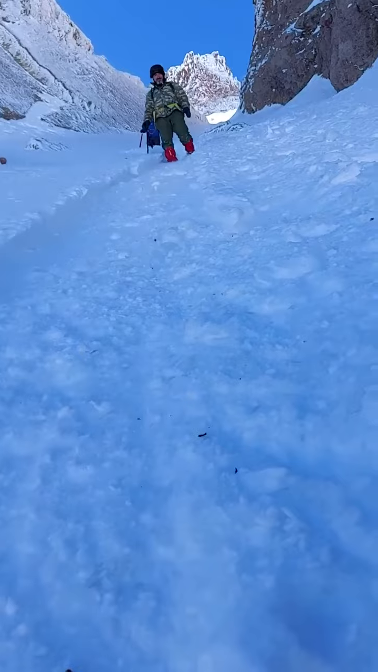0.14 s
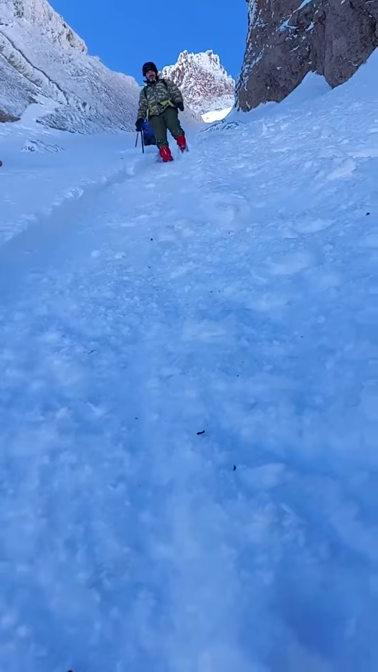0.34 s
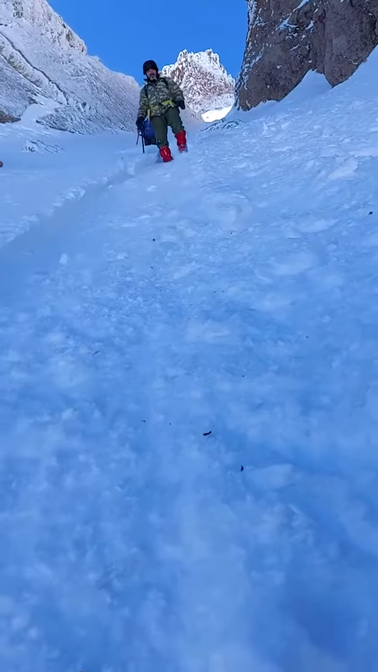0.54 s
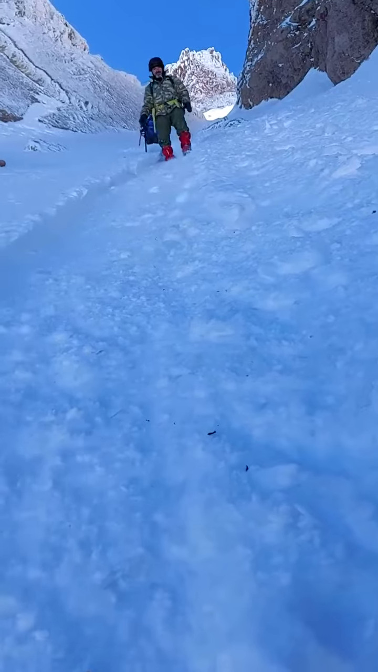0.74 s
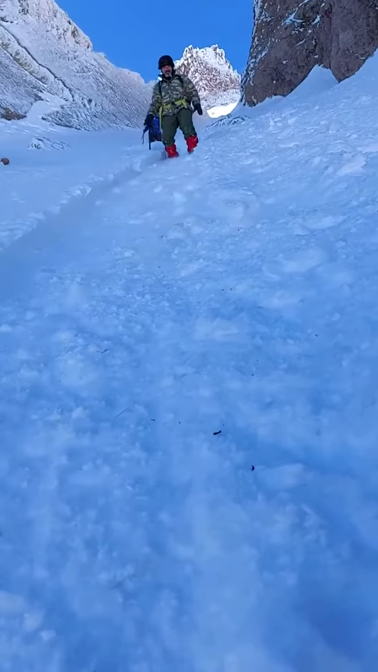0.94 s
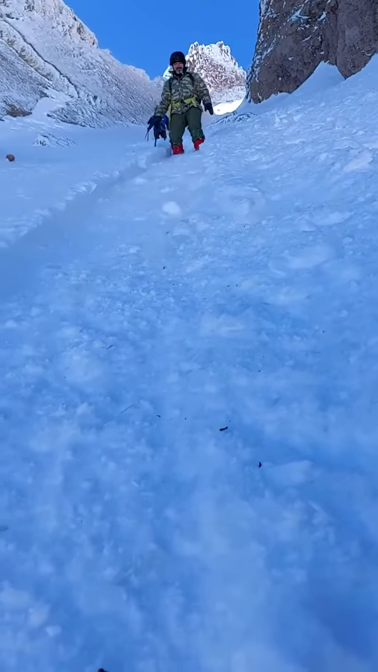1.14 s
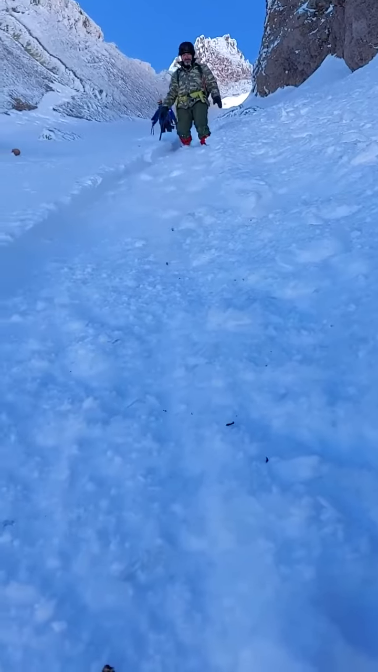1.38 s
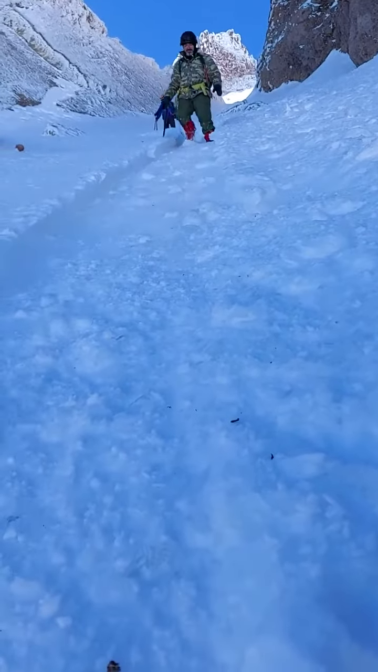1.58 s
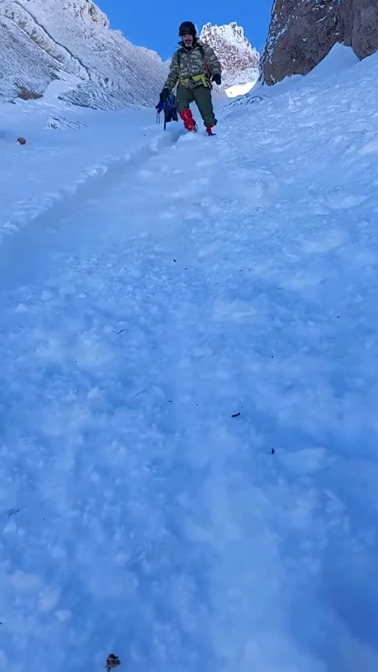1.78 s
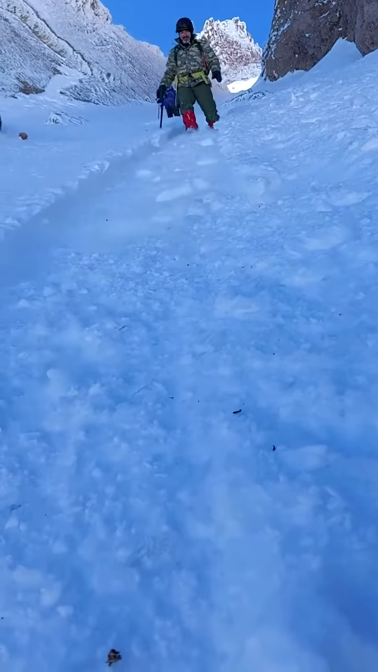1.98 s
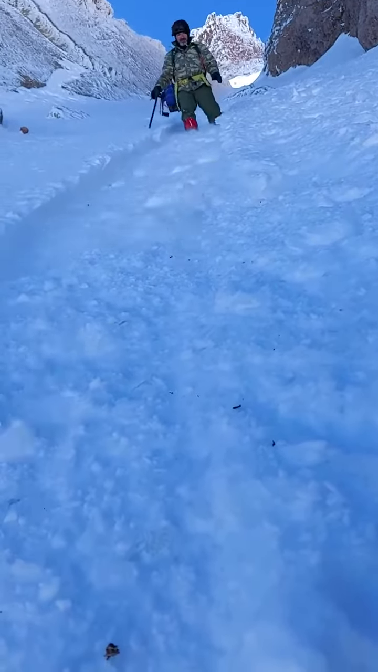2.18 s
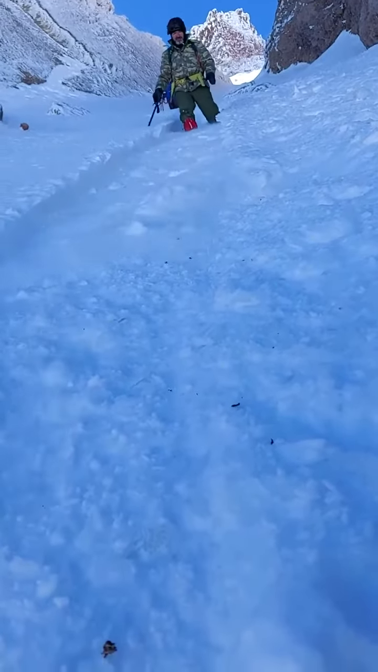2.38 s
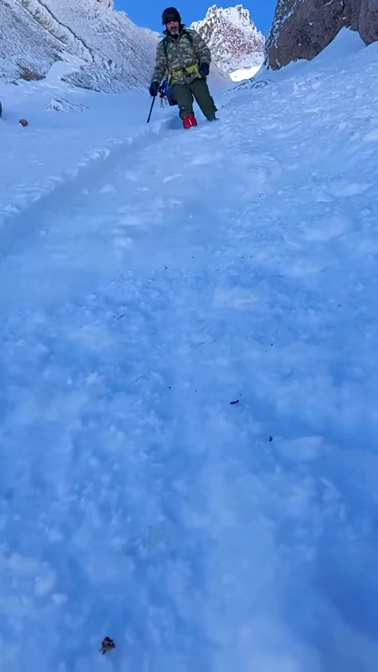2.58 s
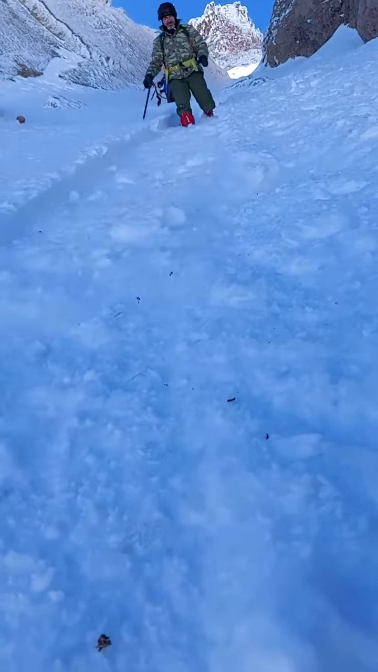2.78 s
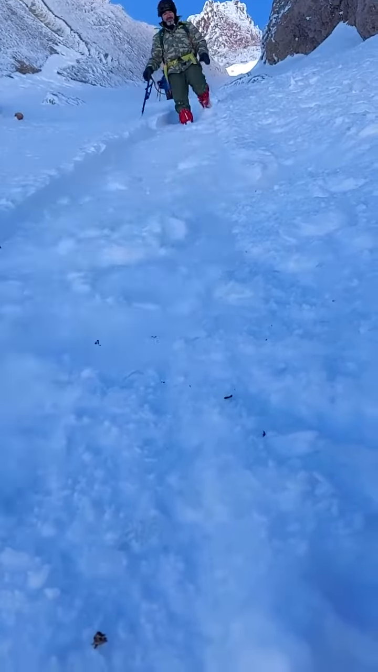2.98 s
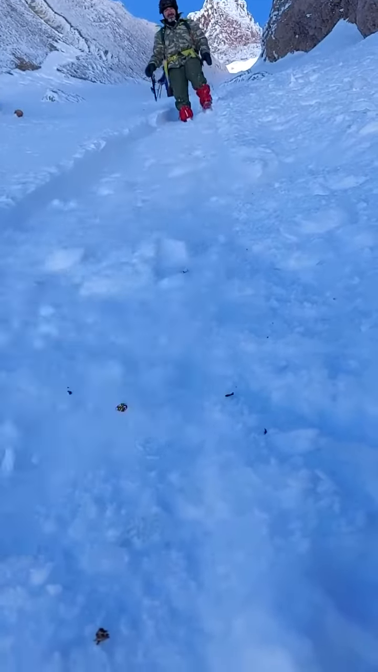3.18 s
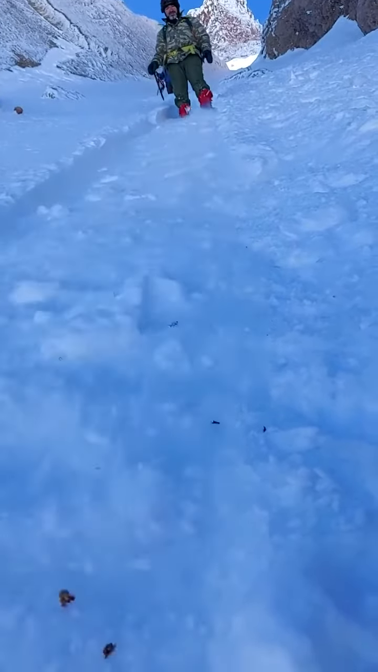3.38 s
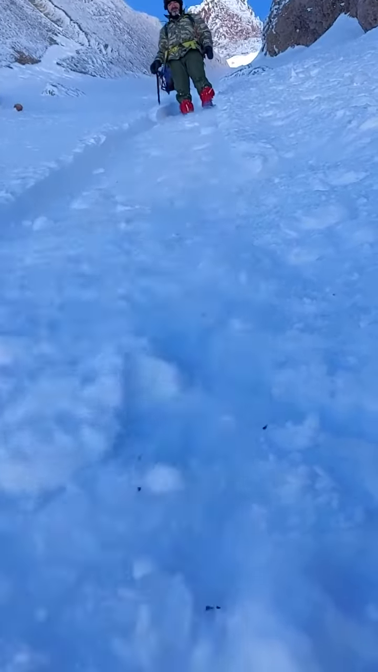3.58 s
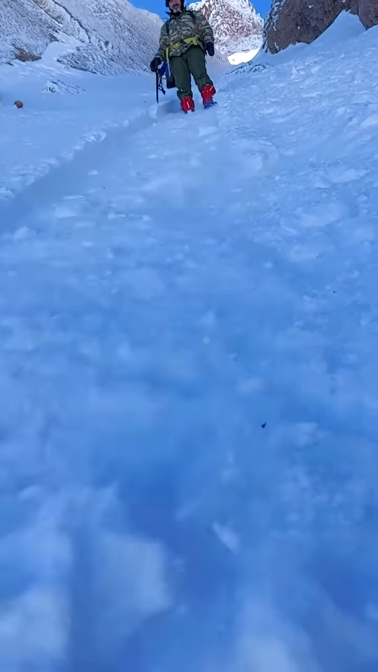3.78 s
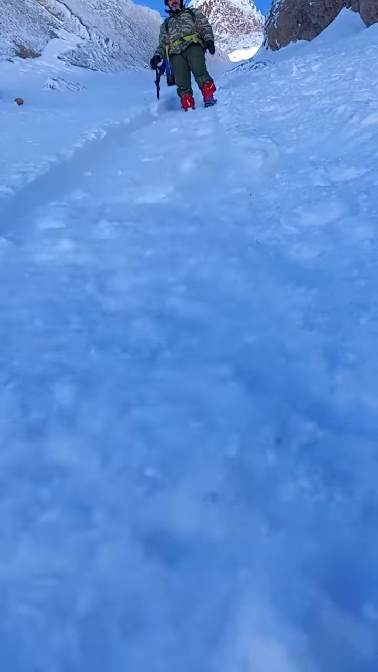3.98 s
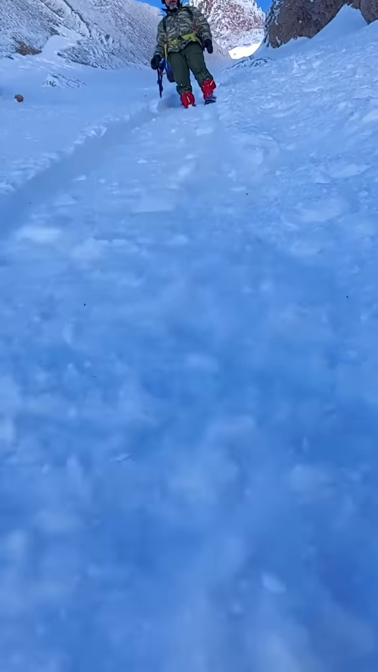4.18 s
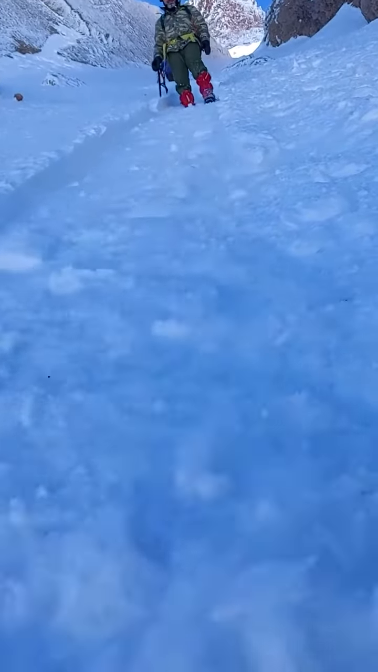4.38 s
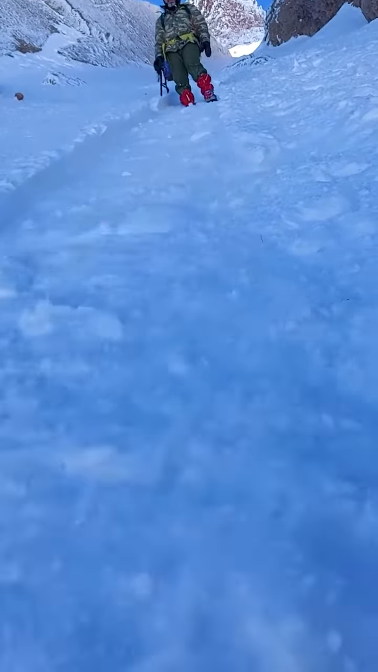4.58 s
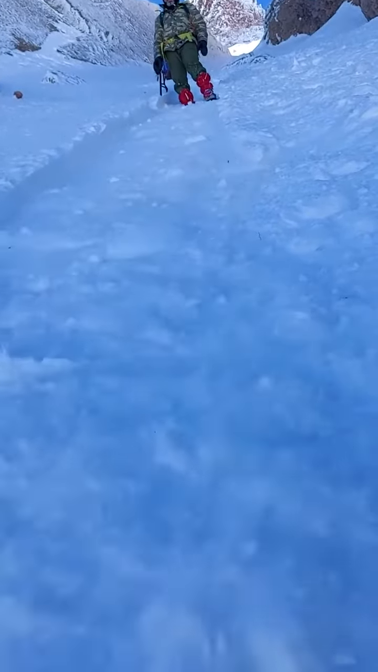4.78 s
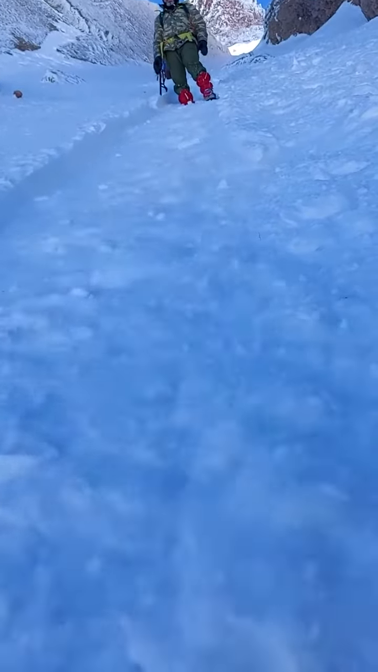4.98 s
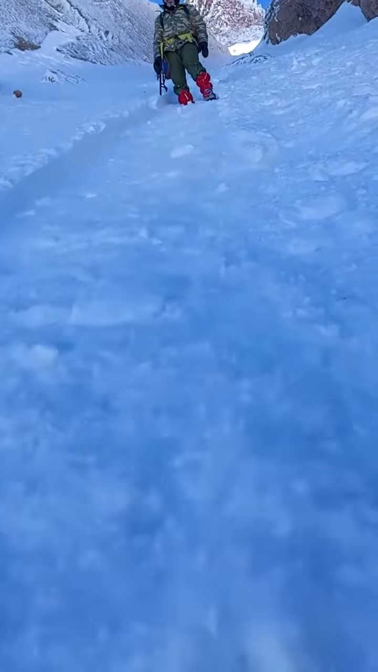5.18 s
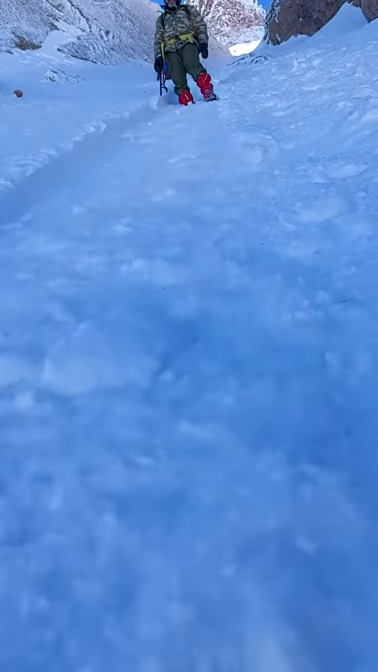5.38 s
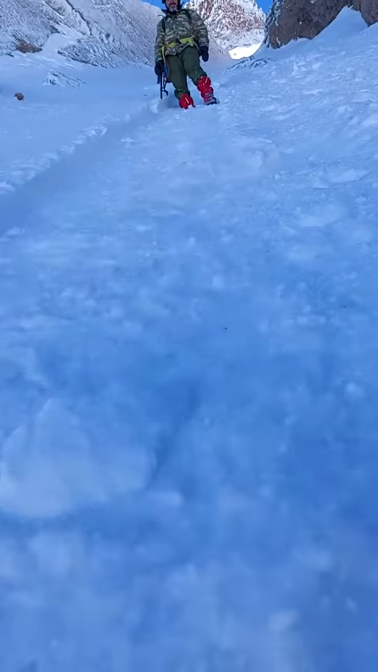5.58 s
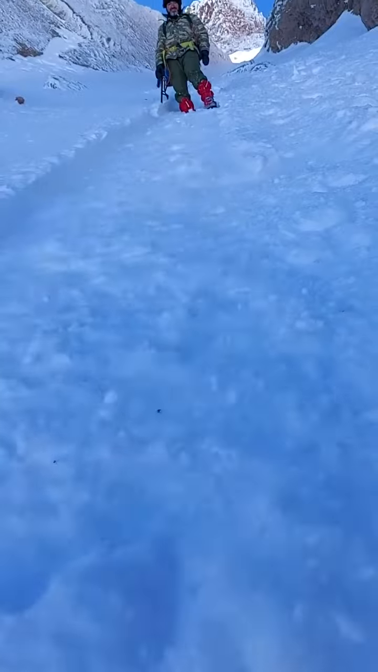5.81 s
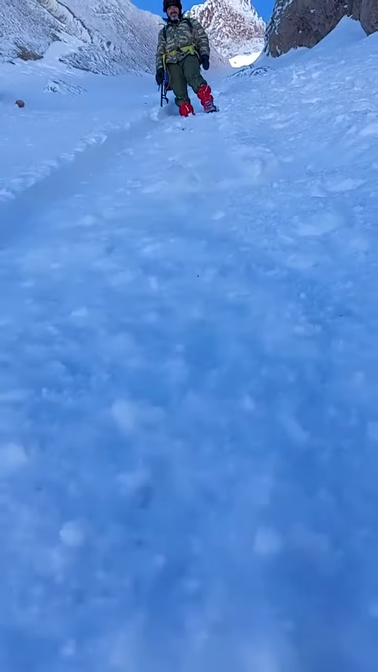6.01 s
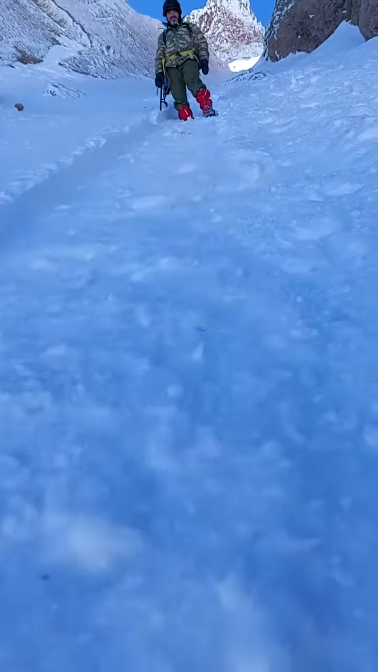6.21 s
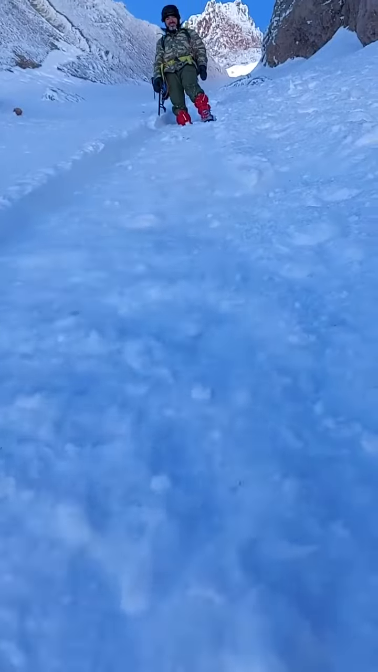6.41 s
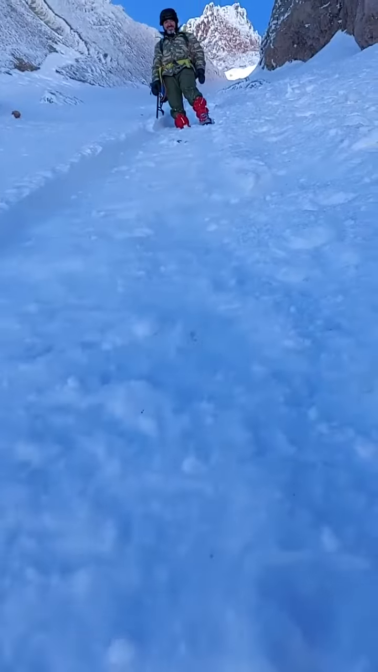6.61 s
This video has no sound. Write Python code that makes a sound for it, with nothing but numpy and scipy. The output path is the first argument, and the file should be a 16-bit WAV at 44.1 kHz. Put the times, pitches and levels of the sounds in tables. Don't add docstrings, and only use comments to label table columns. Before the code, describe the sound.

A steady rush of sliding snow swells close by, cracking and grinding, then streams on, after a climber's crunching steps and small metallic clinks.

```python
import sys
import numpy as np
from scipy import signal
from scipy.io import wavfile
from scipy.ndimage import uniform_filter1d, map_coordinates

SR = 44100
rng = np.random.default_rng(int(sys.argv[2]) if len(sys.argv) > 2 else 0)


def convert_level_to_amplitude(level_db):
    exponent = np.asarray(level_db, float) / 20
    return 10 ** exponent


def to_wav(s):
    ch = np.atleast_2d(s).T
    pcm = np.round(np.clip(ch, -1, 1) * 32767)
    wavfile.write(sys.argv[1], SR, pcm.astype(np.int16))


N = 293265

# [t/s, lateness at the left port/samples, width of the flow/samples]
SNOW_PATH = [(0, 17, 2.0), (.15, 16, 1.6), (.38, 18, 2.0), (.46, 21, 5), (.64, 20, 5), (.72, 15.5, 1.6),
             (.8, 16, 2.5), (.87, 24, 1.3), (1.0, 23, 1.3), (1.16, 23.5, 1.3), (1.24, 20, 5),
             (1.33, -6, 3.5), (1.47, -7.2, 1.2), (1.56, -7.5, 2.2), (1.65, -8, 1.0), (1.75, -8.8, 1.6),
             (2.0, -8.5, 3.5), (2.3, -7, 1.5), (2.4, -6.2, 1.2), (2.5, -5.5, .5), (2.72, -5.5, .3),
             (2.775, -5.0, .2), (2.795, -4.2, .2), (2.85, -3.85, .4), (2.93, -3.8, .8), (3.0, -4, 1.2),
             (3.15, -2.5, 1.6), (3.3, 0.3, 1.8), (3.45, 4.5, 3.4), (3.62, 12, 2.0), (3.8, 19, 3.0),
             (3.95, 24.5, 2.0), (4.3, 21.5, 3.0), (4.7, 21, 3.5), (4.88, 24.5, 1.5), (5.15, 21, 3.5),
             (5.6, 23, 2.4), (5.9, 24, 2.0), (6.65, 24.5, 2.4)]
SCRAPE_DB = -38


def rms_one(x):
    return x / np.sqrt(np.mean(x ** 2) + 1e-20)


def bandpass(x, low_hz, high_hz, order):
    return signal.sosfilt(signal.butter(order, [low_hz, high_hz], "band", fs=SR, output="sos"), x)


def resonance(x, hz, width_hz):
    r = np.exp(-np.pi * width_hz / SR)
    return signal.lfilter([(1 - r * r) / 2, 0, (r * r - 1) / 2], [1, -2 * r * np.cos(2 * np.pi * hz / SR), r * r], x)


def in_time(rows):
    s, *columns = np.transpose(rows)
    return [np.interp(np.arange(N) / SR, s, column) for column in columns]


def per_sample(coarse):
    return np.interp(np.arange(N) / 32, np.arange(len(coarse)), coarse)


def swells(rows, rise_db_per_s, fall_db_per_s):
    start, hold, db = np.transpose(rows)[:3, :, None]
    t = np.arange(0, N + 32, 32) / SR
    early = np.maximum(start - t, 0)
    late = np.maximum(t - start - np.abs(hold), 0)
    return convert_level_to_amplitude(db - rise_db_per_s * early - fall_db_per_s * late)


def swell_gain(rows, rise_db_per_s, fall_db_per_s):
    return per_sample(swells(rows, rise_db_per_s, fall_db_per_s).sum(axis=0))


def drift(rate):
    r = np.exp(-80 * np.pi * rate / SR)
    noise = rng.standard_normal(N // 40 + 2002)
    slow = signal.lfilter([1], [1, -2 * r, r * r], noise)[2000:]
    return np.interp(np.arange(N) / 40, np.arange(len(slow)), rms_one(slow))


def ports(x, lag):
    left = map_coordinates(x, [np.arange(N) - lag], order=2, mode="nearest")
    return np.array([left, x])


def grains(per_s, spread_db, clump_db, smooth):
    draw = rng.laplace(size=N)
    sizes = np.sign(draw) * convert_level_to_amplitude(spread_db * np.minimum(np.abs(draw), 5))
    born = rng.random(N) < per_s * convert_level_to_amplitude(clump_db * drift(40)) / SR
    return rms_one(rms_one(sizes * born) + smooth * rng.standard_normal(N))


def hits(table, lags, cycles, rough, gain_db, rise_s):
    rough_reach = 1.7
    out = np.zeros((2, N + SR))
    t = np.arange(SR // 8) / SR
    noises = rng.standard_normal((len(table), len(t)))
    for (s, peak_db, hz, *t60), lag, noise in zip(table, lags, noises):
        top_hz = min(rough_reach * hz, SR / 3)
        noise = rms_one(signal.lfilter(*signal.butter(2, top_hz, fs=SR), noise))
        fade_s = t60[0] if t60 else cycles / hz
        fade = convert_level_to_amplitude(-60 * t / fade_s) * (1 - np.exp(-t / rise_s))
        ring = convert_level_to_amplitude(peak_db + gain_db) * fade * (np.sin(2 * np.pi * hz * t) + rough * noise)
        for port, start in enumerate((round(s * SR + lag), round(s * SR))):
            out[port, start:start + len(t)] += ring
    return out[:, :N]


def swing(hz):
    # [t/s, fine powder level/dB, heavy lumps level/dB]
    amount = [(0, -4, -16.5), (.3, -5, -15), (.55, -11, -19.5), (1.0, -9, -14.5), (1.4, -12.5, -21.5),
              (1.7, -8.5, -18), (2.0, -14.5, -16), (2.4, -8.5, -19), (2.75, -1.5, -14.5), (3.05, -1, -11),
              (3.35, 4, -5.5), (3.5, 3.5, -4.5), (3.75, 9.5, -4), (4.0, 12, 1.5), (4.3, 5, 0.5),
              (5.0, 0, 0.5), (5.8, 1.5, -1), (6.65, 0, -0.5)]
    # [f/Hz, share of powder, share of lumps, share of grinding]
    layers = [(298, 0.17, 0.91, -0.78), (603, 0.26, 1.07, -1.1), (1040, 0.12, 1.03, -0.36),
              (2900, 0.53, 0.42, 0.46), (7100, 0.85, 0.011, -0.89), (12700, 0.79, 0.014, -0.16)]
    # [start of the top t/s, hold/s, level against the flow/dB]
    surges = [(.12, 0.038, -17), (.62, 0.11, -12), (1.12, 0.019, -36), (1.5, 0.043, -25), (1.75, 0.04, -10),
              (2.12, 0.061, -6), (2.9, 0.02, -33), (3.35, 0.014, -20), (3.6, 0.032, -11),
              (3.84, 0.015, -12), (4.68, 0.024, -7), (4.87, 0.024, -7), (5.28, 0.066, -11),
              (5.58, 0.019, -13), (5.88, 0.12, -10), (6.25, 0.065, -14)]
    front_s, front_spread_s, grind_db = 4.04, 0.21, 4
    powder_db, lumps_db = in_time(amount)
    burst = swell_gain(surges, rise_db_per_s=291, fall_db_per_s=144)
    front_db = grind_db * np.exp(-((np.arange(N) / SR - front_s) / front_spread_s) ** 2)
    layer_hz, *shares = np.transpose(layers)
    shares = [np.interp(np.log(hz), np.log(layer_hz), share) for share in shares]
    return np.transpose(shares) @ [powder_db + 20 * np.log10(1 + burst), lumps_db, front_db]


def flow(lag, width, scattered):
    near = [grains(6000, spread_db=3.0, clump_db=2.5, smooth=1.2) for strand in range(3)]
    far = np.array([grains(6000, spread_db=6.5, clump_db=3.5, smooth=0.87) for port in range(2)])
    share = np.clip(scattered, 0, 1)
    versions = []
    for turn in (0, N // 2):
        strands = [ports(np.roll(g, turn), lag + side * width) for g, side in zip(near, (-1, 0, 1))]
        direct = np.sqrt((1 - share) / 3) * sum(strands)
        versions.append((direct, np.sqrt(share) * np.roll(far, turn, axis=1)))
    return versions


def slide(patchy_db, shared, scatter_hz):
    # [f/Hz, level per Hz/dB]
    colour = [(140, -3), (200, -3), (400, 0.5), (600, 2.5), (1200, -0.5), (2200, -0.5), (3200, 0.7),
              (4400, -0.77), (5900, -2), (7500, -2.5), (9000, 0), (11500, -3), (14000, 0.5), (16000, -2.5)]
    lag, width = in_time(SNOW_PATH)
    scattered = 0.19 + 0.12 * width
    lag = lag + 0.19 * width * drift(3.4)
    versions = flow(lag, width, scattered)
    together = drift(9)
    edges = 111 * 2 ** (np.arange(23) / 3)
    centres = np.sqrt(edges[1:] * edges[:-1])
    change_db = swing(centres)
    colour_hz, colour_db = np.transpose(colour)
    out = 0
    for k, hz in enumerate(centres):
        direct, scatter = versions[k % 2]
        scatter_gain = 0.5 + 2.04 / (1 + (scatter_hz / hz) ** 2)
        band = bandpass(direct + scatter * scatter_gain, edges[k], edges[k + 1], 2)
        flicker_db = patchy_db * (shared * together + drift(12.0))
        level_db = np.interp(np.log(hz), np.log(colour_hz), colour_db) + change_db[k] + flicker_db
        out = out + convert_level_to_amplitude(level_db) * np.sqrt(hz) * rms_one(band)
    return convert_level_to_amplitude(-81.0) * out


def lumps():
    # [t/s (each sounds 4 ms later), peak level/dB, f/Hz]
    blows = [(1.845, -36.5, 905), (2.766, -34.5, 630), (3.025, -29, 1550), (3.053, -17, 2020),
             (3.288, -27, 1640), (3.307, -29, 363), (3.47, -39, 482), (3.505, -28.5, 640),
             (3.687, -37, 567), (4.371, -22.5, 660), (4.521, -40, 440), (4.862, -36, 1750), (5.1, -34, 620),
             (5.29, -32, 450), (5.925, -60, 428), (6.071, -45, 295), (6.145, -35, 630), (6.337, -51, 204),
             (6.346, -31, 390), (6.52, -29.5, 595)]
    delay_s = .004
    lag = in_time(SNOW_PATH)[0]
    lags = [lag[int(blow[0] * SR)] for blow in blows]
    knocks = hits(blows, lags, cycles=3.4, rough=0.35, gain_db=7.0, rise_s=.0001)
    return np.roll(knocks, round(delay_s * SR), axis=1)


def snaps():
    # [t/s, peak level/dB, f/Hz, lateness at the left port/samples]
    cracks = [(.8185, -41, 2080, 18), (.841, -38, 2330, 13), (2.5916, -31, 6000, 0.5),
              (2.9097, -32, 4500, 3), (3.029, -36, 1890, 27), (3.053, -17.5, 6050, 19),
              (3.0562, -12, 7500, 23.5), (3.2902, -25, 3300, 4), (3.5775, -31, 3500, 14),
              (3.5952, -27.5, 3850, 13), (3.6228, -22, 3780, 10.5), (3.9277, -20.5, 3300, 23.5),
              (3.963, -22.5, 3470, 26.5), (3.985, -25, 3050, 26.5), (3.9947, -18.5, 3300, 21),
              (4.026, -22, 5100, 27.5), (4.697, -35, 7000, 21), (4.8364, -30, 5140, 24),
              (4.866, -29.5, 1590, 25), (5.8315, -36, 4500, 23), (5.865, -24, 6100, 24.5)]
    lags = np.transpose(cracks)[3]
    out = hits([c[:3] for c in cracks], lags, cycles=28.2, rough=0.99, gain_db=4.0, rise_s=.0003)
    return bandpass(out, 1100, 16000, 2)


def rings(table):
    return hits([r[:4] for r in table], np.transpose(table)[4], 0, rough=0.048, gain_db=1.0, rise_s=0.00045)


def late_clinks():
    # [t/s, peak level/dB, f/Hz, time to fall by 60 dB/s, lateness at the left port/samples]
    pieces = [(3.098, -33, 3600, 0.058, 3.5), (3.34, -36, 3550, .05, 2), (3.395, -35, 3670, .04, 3),
              (3.4344, -26.5, 4850, 0.061, 2), (3.52, -28, 3580, 0.035, 8.5), (3.532, -30, 4900, .05, 6.5),
              (3.575, -30.5, 4920, 0.04, 10.5), (3.631, -22.5, 3550, 0.043, 15),
              (4.027, -25, 5320, 0.04, -6), (5.0185, -32, 7040, 0.027, 25.5), (5.213, -35, 3080, 0.061, 0),
              (5.8658, -26, 7830, 0.18, 26.5), (6.0776, -27.5, 6800, .025, 23),
              (6.392, -23, 6700, 0.016, 14), (6.5933, -33.5, 5130, 0.038, 24)]
    return rings(pieces)


def ice_chips(per_s, cycles, level_db):
    pitches = np.geomspace(900, 7800, 18)
    knocks = grains(per_s, spread_db=2.5, clump_db=2.0, smooth=0)
    dealt = rng.integers(0, 18, N)
    out = 0
    for k, hz in enumerate(pitches):
        out = out + resonance(knocks * (dealt == k) + 1e-18, hz, 0.94 * hz / cycles) * np.sqrt(cycles)
    return convert_level_to_amplitude(SCRAPE_DB + swing(3000) + level_db) * rms_one(out)


def crackle(per_s, level_db):
    ticks = -np.abs(grains(per_s, spread_db=6.5, clump_db=1.0, smooth=0))
    ticks = bandpass(ticks, 1500, 7000, 1)
    return convert_level_to_amplitude(SCRAPE_DB + swing(2700) + level_db) * rms_one(ticks)


def clinks():
    # [t/s, peak level/dB, f/Hz, time to fall by 60 dB/s, lateness at the left port/samples]
    contacts = [(0.0173, -25.5, 4300, 0.0089, 11), (0.089, -31, 12800, 0.036, 13),
                (0.128, -37, 7300, 0.072, 16), (0.1594, -31.5, 7300, 0.028, 11),
                (0.4977, -35.5, 7560, 0.03, 13), (0.6274, -29, 4420, 0.038, 17.5),
                (0.669, -39, 4500, 0.03, 20), (0.799, -40, 6200, 0.04, 15), (0.815, -37, 6200, 0.063, 17.5),
                (0.838, -29.5, 6200, 0.019, 14.5), (0.849, -35, 6200, 0.02, 17),
                (0.9294, -36, 4440, 0.027, 17), (1.148, -40, 4450, 0.03, 18),
                (1.527, -31, 8300, 0.035, 5.5), (1.604, -38, 4270, 0.032, -8), (1.41, -42, 5200, .02, -4),
                (1.6097, -36, 4280, .03, -7), (1.664, -34, 3300, 0.054, -10),
                (2.0621, -37, 4450, 0.037, -6.5), (2.1679, -36, 5050, 0.016, -6.5),
                (2.437, -38, 6440, .03, -6), (2.5855, -30, 6270, 0.02, -2.5),
                (2.5918, -17.5, 6360, 0.014, 1), (2.5952, -23, 6400, 0.015, 1.5),
                (2.592, -26.5, 7300, 0.013, 1), (2.611, -37, 7300, 0.04, -1.5),
                (2.617, -29, 6400, 0.02, -6), (2.8534, -37, 7000, .02, -5.5),
                (2.9098, -34, 7300, 0.022, -5.5), (2.9505, -30, 9270, 0.029, 5)]
    return rings(contacts)


def jangle(per_s):
    # [f/Hz, level/dB, time to fall by 60 dB/s]
    pitches = [(3300, 0.5, 0.016), (4500, 3.5, 0.025), (6200, -33, 0.036), (7300, -13, 0.027),
               (5050, -4.5, 0.025)]
    # [start of the top t/s, hold/s, level/dB]
    shakes = [(0, 0.0036, -64), (.63, .01, -69), (.95, .01, -65), (1.15, 0.0054, -69), (1.25, 0.023, -60.5),
              (1.6, 0.13, -59), (1.9, 0.0041, -54.5), (2.07, .005, -64), (2.59, 0.035, -71),
              (2.84, 0.074, -62), (3.06, .002, -48.5), (3.2, 0.14, -64), (3.42, 0.21, -56),
              (3.62, 0.0056, -60)]
    sway_db, steps_end_s = -69.5, 3.74
    shaken = swell_gain(shakes, rise_db_per_s=398, fall_db_per_s=303) + convert_level_to_amplitude(sway_db)
    fade = np.clip((steps_end_s - np.arange(N) / SR) * 10, 0, 1)
    out = 0
    for hz, level_db, t60 in pitches:
        touches = (rng.random(N) < per_s / SR) * rng.standard_normal(N) * convert_level_to_amplitude(5.0 * drift(23.0))
        out = out + convert_level_to_amplitude(level_db) * shaken * rms_one(resonance(touches + 1e-18, hz, 2.6 / t60))
    return fade * out


def strap():
    # [start of the top t/s, hold/s, level/dB]
    squeaks = [
        (.07, 0.3, -58.5),
        (.6, 0.24, -58.5),
        (1.0, 0.096, -60),
    ]
    tone = rms_one(resonance(rng.standard_normal(N), 1770, 300))
    return swell_gain(squeaks, rise_db_per_s=143, fall_db_per_s=143) * tone


def climber_gear():
    early_lag, late_lag, turn_s = 20.0, -9.0, 1.3
    lag = np.where(np.arange(N) < turn_s * SR, early_lag, late_lag)
    return ports(jangle(230) + strap(), lag)


def treads():
    # [start of the top t/s, hold/s, level/dB]
    steps = [
        (.12, 0.075, -62),
        (1.35, 0.16, -60),
        (1.62, 0.4, -76),
        (2.15, 0.3, -62.5),
        (2.62, 0.22, -63.5),
    ]
    crush = bandpass(grains(400, spread_db=5.5, clump_db=6.0, smooth=1.6), 207, 450, 2)
    level = swell_gain(steps, rise_db_per_s=152, fall_db_per_s=100)
    return ports(level * rms_one(crush), -12.5)


def wind():
    # [start of the top t/s, hold/s, level/dB, left minus right level/dB]
    gusts = [(.01, 0.049, -47, 5), (0.178, .002, -38, 4), (0.442, 0.0079, -52, 11), (0.51, 0.009, -58, -4),
             (0.62, 0.096, -50.5, 2), (0.894, 0.072, -46, -3.5), (1.042, 0.11, -59.5, -3),
             (1.262, .005, -55, 6), (1.397, 0.09, -34.5, 1.5), (1.637, 0.0044, -46, 6),
             (1.824, 0.021, -62, 24), (2.068, 0.0045, -51.5, 20), (2.186, 0.015, -40, 5),
             (2.275, 0.16, -54.5, 2), (2.568, 0.023, -40, -1.5), (2.78, .01, -51, -18),
             (2.874, 0.0061, -47.5, -7), (3.109, .01, -56, 22), (3.582, 0.0043, -48, -13),
             (3.657, 0.07, -59, -10), (3.907, .01, -56, -13), (4.084, .01, -56, -18),
             (4.21, 0.3, -64.5, -21), (4.86, 0.79, -66, -24.5), (5.88, 0.2, -61.5, -19),
             (6.21, .005, -58, -18), (6.34, 0.0045, -43.5, -7), (6.565, .01, -55, -16)]
    rumble_hz, width_hz = 68.6, 59
    breeze_db, breeze_pan_db = -70, 15.5
    edge_db, edge_grows = -20, 0.55
    alike = 0.21
    curves = swells(gusts, rise_db_per_s=308, fall_db_per_s=378)
    pan_db = np.transpose(gusts)[3]
    level = []
    for side in (1, -1):
        gust = per_sample(convert_level_to_amplitude(side * pan_db / 2) @ curves)
        level.append(gust + convert_level_to_amplitude(breeze_db + side * breeze_pan_db / 2))
    level = np.array(level)
    common, *own = rng.standard_normal((3, N))
    air = np.sqrt(alike) * common + np.sqrt(1 - alike) * np.array(own)
    rumble = rms_one(bandpass(air, rumble_hz - width_hz / 2, rumble_hz + width_hz / 2, 2))
    edge = rms_one(bandpass(air, 110, 420, 1))
    body = rumble + convert_level_to_amplitude(edge_db) * (level / convert_level_to_amplitude(-26.0)) ** edge_grows * edge
    body = signal.sosfilt(signal.butter(3, 42, "high", fs=SR, output="sos"), body)
    lumpy = convert_level_to_amplitude(2.6 * np.array([drift(29), drift(33)]))
    return level * rms_one(body * lumpy)


def scene():
    chips = ice_chips(500, cycles=130.0, level_db=-18.5) + crackle(100, level_db=-22.0)
    snow = slide(patchy_db=1.53, shared=0.37, scatter_hz=1335) + lumps() + snaps()
    ringing = late_clinks() + ports(chips, in_time(SNOW_PATH)[0])
    left, right = snow + ringing + clinks() + climber_gear()
    left = convert_level_to_amplitude(-0.78) * signal.lfilter(*signal.butter(1, 293, "high", fs=SR), left)
    return np.array([left, right]) + treads() + wind()


def housing(dry):
    # [f/Hz, width/Hz, share added]
    humps = [(2640, 470, -0.14), (3500, 400, 0.14), (4510, 400, -0.12), (4960, 300, 0.26),
             (5890, 260, -0.13), (6920, 480, 0.46), (8800, 350, -0.29)]
    return dry + sum(share * resonance(dry, hz, width_hz) for hz, width_hz, share in humps)


def duck(x):
    # [start t/s, hold/s, share removed/dB]
    dips = [
        (3.062, 0.012, -5),
    ]
    return x * (1 - swell_gain(dips, rise_db_per_s=1504, fall_db_per_s=1504))


def thin_lines(x):
    size, lines_per_band = 4096, 8
    weak_db, weak_band_db, weak_from_hz = -4.0, -2.6, 1020
    frame = dict(window="cosine", nperseg=size, noverlap=size // 2, fs=SR)
    mid_side = np.array([x[0] + x[1], x[0] - x[1]]) / 2
    hz, _, lines = signal.stft(mid_side, **frame)
    power = np.abs(lines) ** 2
    band = uniform_filter1d(power, size=lines_per_band, axis=1)
    wide = uniform_filter1d(power, size=6 * lines_per_band, axis=1).mean(axis=0)
    strong_line = power > convert_level_to_amplitude(2 * weak_db) * band.mean(axis=0)
    strong_band = band > convert_level_to_amplitude(2 * weak_band_db) * wide
    keep = (strong_line & strong_band) | (hz < weak_from_hz)[:, None]
    mid, side = signal.istft(lines * keep, **frame)[1][:, :N]
    return np.array([mid + side, mid - side])


def smooth_power(v):
    over_hz = uniform_filter1d(np.abs(v) ** 2, 3, axis=1)
    return uniform_filter1d(over_hz, 10, axis=2) + 1e-16


def rebuild_top(low, full):
    copies = [(46, 88, 44), (88, 97, 48)]
    shelf_db, true_share = -2.5, .3
    frame = dict(nperseg=256, noverlap=192)
    low = signal.stft(low, **frame)[2]
    full = signal.stft(full, **frame)[2]
    out = low.copy()
    for first, last, shift in copies:
        source = low[:, first - shift:last - shift]
        target = full[:, first:last]
        copied = np.sqrt((1 - true_share) * smooth_power(target) / smooth_power(source)) * source
        out[:, first:last] = convert_level_to_amplitude(shelf_db) * (copied + np.sqrt(true_share) * target)
    return signal.istft(out, **frame)[1][:, :N]


def top_cut(x):
    return signal.sosfilt(signal.butter(12, 15910, fs=SR, output="sos"), x)


def record(dry):
    x = duck(housing(dry))
    x = rebuild_top(thin_lines(x), x)
    x = signal.sosfilt(signal.cheby2(12, 60, 16410, fs=SR, output="sos"), x)
    return top_cut(x)


dry = scene()
out = record(dry)
to_wav(out)
```